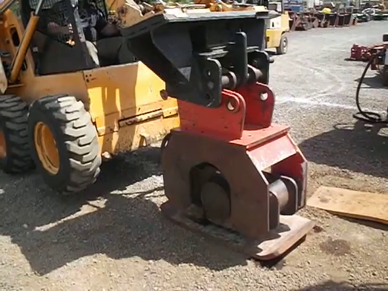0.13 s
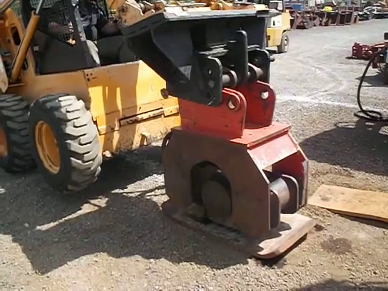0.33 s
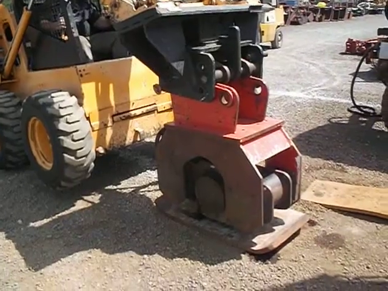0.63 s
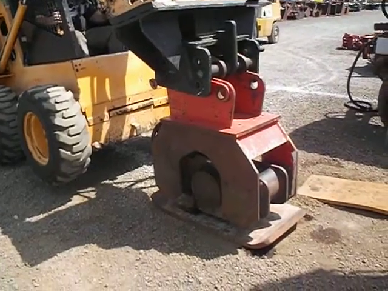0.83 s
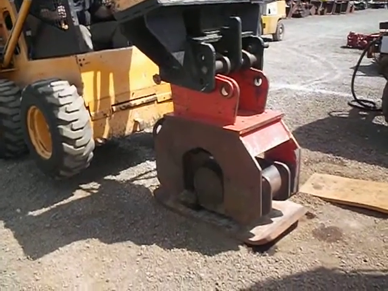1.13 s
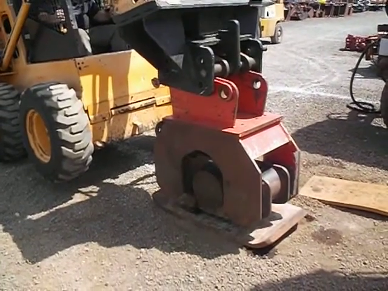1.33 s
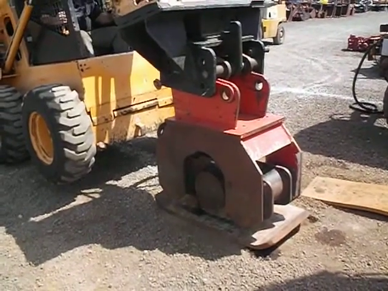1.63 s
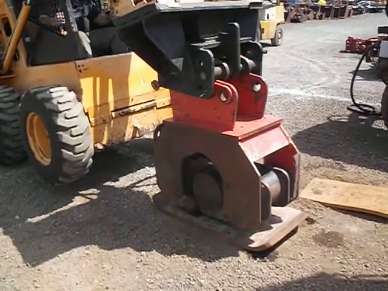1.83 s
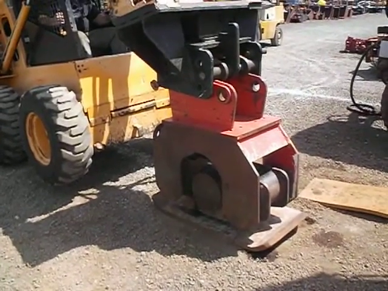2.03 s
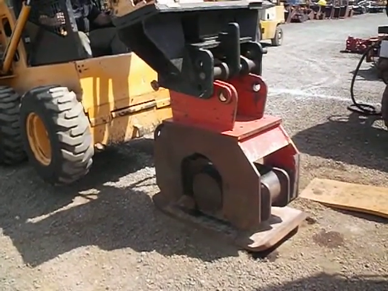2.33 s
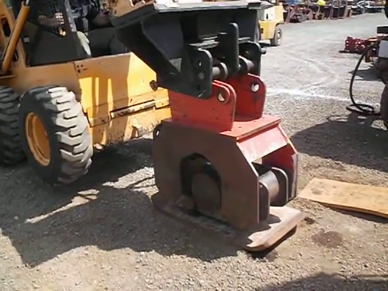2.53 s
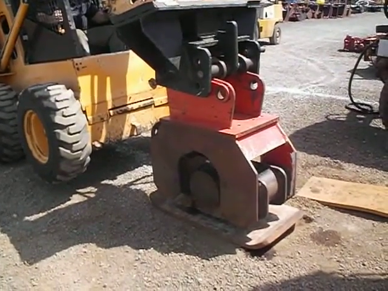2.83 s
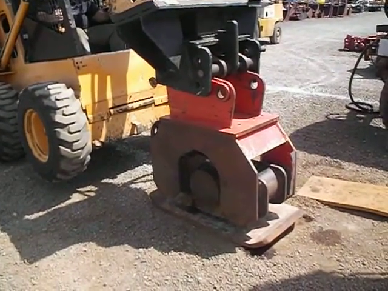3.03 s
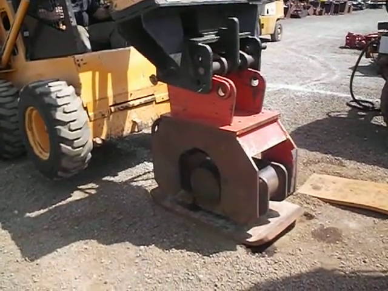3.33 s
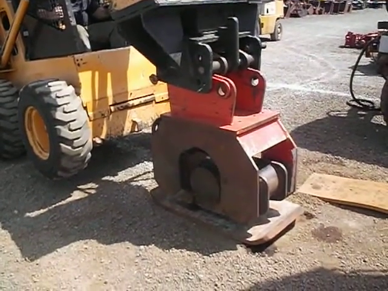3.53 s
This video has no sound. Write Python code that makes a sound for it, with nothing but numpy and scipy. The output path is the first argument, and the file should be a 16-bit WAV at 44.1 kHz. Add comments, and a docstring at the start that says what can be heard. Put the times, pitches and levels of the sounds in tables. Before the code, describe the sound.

Outdoors, a few metres from a small microphone, a diesel engine drones briefly before a plate compactor kicks in. It thumps, rattles and clanks quickly over a pump whine, then settles into fast, dull knocking that grows louder.

```python
"""Loader starting a plate compactor

A gravel yard, a small camera microphone a few metres from a diesel skid-steer loader at high revs.
It starts a hydraulic plate compactor: the engine sags under the load and the pump begins to whine.
The eccentric weight rattles the steel mount once a turn: bright clanks at first, then a duller,
regular knocking as the plate settles on the ground."""
import sys
import numpy as np
from scipy import signal
from scipy.fft import rfft, irfft
from scipy.io import wavfile
from scipy.ndimage import uniform_filter1d, minimum_filter1d

SR = 44100
rng = np.random.default_rng(int(sys.argv[2]) if len(sys.argv) > 2 else 0)


def to_wav(sig):
    """Store sig (one row per channel, or 1-D mono) as 16-bit WAV at the path in sys.argv[1].

    Samples outside -1..1 are clipped; the rate is SR.
    """
    pcm = np.clip(np.atleast_2d(sig), -1, 1) * 32767
    pcm = np.round(pcm).astype(np.int16)
    wavfile.write(sys.argv[1], SR, pcm.T)  # frames by channels


N = 162288
T = np.arange(N) / SR


def amp(db):
    """Decibels to gain."""
    return 10 ** (np.asarray(db) / 20)


def unit(x):
    """Scale to rms 1."""
    return x / np.sqrt(np.mean(x ** 2) + 1e-18)


def curve(rows, t=T):
    """Straight lines through (time, value) rows."""
    return np.interp(t, *np.array(rows, float).T)


def colour(x, rows):
    """Filter by a spectrum (f/Hz, relative level/dB), then scale to rms 1."""
    hz, db = np.array(rows, float).T
    f = np.maximum(np.arange(N // 2 + 1) * SR / N, 1)
    gain = amp(np.interp(np.log(f), np.log(hz), db))
    return unit(irfft(rfft(x) * gain, N))


def walk(rate_hz):
    """Smooth random wandering, rms 1."""
    size = max(int(SR / rate_hz), 2)
    drift = uniform_filter1d(rng.standard_normal(N), size, mode="wrap")
    return unit(uniform_filter1d(drift, size, mode="wrap"))


def ring(x, modes):
    """Drive decaying modes (f/Hz, t60/s, gain/dB) with x."""
    out = 0
    for hz, t60, db in modes:
        pole = np.exp((2j * np.pi * hz - np.log(1000) / t60) / SR)
        out = out + amp(db) * signal.lfilter([1], [1, -pole], x).imag
    return out


def blow(x, size=200):
    """Scale a blow so that its loudest few milliseconds have rms 1."""
    return x / np.sqrt(uniform_filter1d(x ** 2, size).max())


def add(out, x, at):
    """Mix x into out at a time in seconds."""
    i = int(np.clip(at * SR, 0, N))
    out[i:i + len(x)] += x[:N - i]


def tones(turns, rows, load, flutter_db, jitter):
    """Harmonics of a rotation that waver and change their balance with load."""
    out = 0
    for order, free_db, loaded_db in rows:
        gain = amp(free_db) * (1 - load) + amp(loaded_db) * load
        flutter = amp(flutter_db * min(order / 10, 1) * walk(40))
        phase = 2 * np.pi * (order * turns + rng.random()) + jitter * np.sqrt(order) * walk(6.7)
        out = out + np.sqrt(2) * gain * flutter * np.sin(phase)
    return out


# free-running clatter: f/Hz, relative level/dB
CLATTER_SPECTRUM = [(30, -10.5), (60, -4), (140, -10.5), (210, -8.5), (330, -0.5), (480, -0.5), (640, 1),
                    (800, -2.5), (1000, 2.5), (1150, -6), (1600, -5), (1850, -13), (2250, -18),
                    (2650, -11.5), (3100, -8.5), (3450, -18.5), (4000, -13.5), (4500, -19), (5050, -18.5),
                    (6300, -21), (8000, -35.5)]
# the clatter labours as the valve opens: t/s, level/dB before the load fades it out
CLATTER_LEVEL = [(.05, -20.5), (.6, -21), (.72, -18.5), (.78, -20), (.9, -16)]
# exhaust tones: multiple of crank speed, free level/dB, loaded level/dB
EXHAUST_TONES = [(2, -21.5, -32.5), (4, -41.5, -41.5), (5, -42.5, -42), (6, -44, -48), (8, -42.5, -54),
                 (9, -28.5, -39), (10, -29, -46.5), (12, -33, -53.5), (14, -45.5, -41.5), (18, -27, -36),
                 (20, -28, -30), (22, -36, -37), (27, -40.5, -40), (30, -50, -40)]
# fan tones: multiple of blade rate, free level/dB, loaded level/dB
FAN_TONES = [(1, -27, -35), (2, -43, -35.5), (3, -28, -56.5), (4, -38, -41.5)]


def engine(crank, load, firing_depth=0.32, decay_periods=0.36, blade_passes_per_turn=6.775):
    """The diesel, a few metres off: exhaust and fan tones, and clatter swelling at two firings a turn."""
    firing = unit(np.exp(-(2 * crank % 1) / decay_periods))
    pulsing = unit(1 - firing_depth + firing_depth * firing) * amp(0.78 * walk(25))
    clatter = colour(rng.standard_normal(N) * pulsing, CLATTER_SPECTRUM) * amp(curve(CLATTER_LEVEL))
    exhaust = tones(crank, EXHAUST_TONES, load, flutter_db=1.7, jitter=0.042)
    surge_db = 2 * np.exp(-((T - 0.735) / 0.048) ** 2)  # a swell as it takes up the load
    labour_db = 1.95 * load * walk(15)
    fan = tones(blade_passes_per_turn * crank, FAN_TONES, load, flutter_db=-1.5, jitter=0.48)
    return clatter * np.sqrt(1 - load) + exhaust * amp(labour_db + surge_db) + fan


# the pump's whine: t/s, level/dB
WHINE_LEVEL = [(.72, -36), (.79, -38), (.82, -19.5), (.87, -17), (.97, -16.5), (1.08, -23), (1.25, -28.5),
               (1.39, -19), (1.93, -20), (2.02, -16.5), (2.27, -19), (2.9, -20), (3.24, -23), (3.68, -23.5)]


def pump(crank, shaft, order=10, waver_db=1.26):
    """The loaded hydraulic pump sings one strong note, trembling with the compactor."""
    tremble = 1 + .1 * np.sin(2 * np.pi * shaft)
    gain = amp(curve(WHINE_LEVEL) + waver_db * walk(25))
    return np.sqrt(2) * gain * tremble * np.sin(2 * np.pi * order * crank + 0.066 * walk(25))


# engine and shaking steel under load: f/Hz, relative level/dB
RATTLE_SPECTRUM = [(150, -6.5), (350, -1.5), (520, -3.5), (650, 3), (800, 1.5), (960, 5), (1120, -6),
                   (1400, -2.5), (1800, -9), (2250, -17.5), (2650, -10.5), (3050, -10.5), (3400, -16),
                   (3900, -15.5), (4500, -19.5), (5000, -21), (6300, -21.5), (8000, -39.5)]
# that rattle at full load: t/s, level/dB
RATTLE_LEVEL = [(.8, -23.5), (1.15, -19), (1.3, -21.5), (1.6, -20), (1.8, -22), (2.05, -20), (2.45, -21.5),
                (2.7, -21.5), (3.0, -21.5), (3.1, -22.5), (3.68, -23)]
# the plate drumming on the yard floor: f/Hz, relative level/dB
GROUND_SPECTRUM = [(22, -1.5), (42, -4.5), (58, 3.5), (80, -4.5), (155, -10.5), (195, 4), (232, 13.5),
                   (290, 9), (360, -15), (500, -43.5)]
# that drumming: t/s, level/dB
GROUND_LEVEL = [(.1, -39), (.8, -42), (.93, -37.5), (1.05, -25), (1.35, -28.5), (2.0, -30.5), (2.35, -32.5),
                (2.9, -32.5), (3.68, -33.5)]


def shaking(shaft, load, depth=0.13, offset_turns=0.081, grit_db=2, hum_order=4):
    """Dense small contacts rattle the frame; the plate hums and drums on the ground."""
    swell = 1 + depth * np.cos(4 * np.pi * (shaft - offset_turns))  # at both ends of the stroke
    contacts = rng.standard_normal(N) * amp(grit_db * walk(620)) * swell
    rattle = colour(contacts, RATTLE_SPECTRUM) * amp(curve(RATTLE_LEVEL)) * np.sqrt(load)
    hum = np.sin(2 * np.pi * hum_order * shaft) * amp(-41 + 2 * walk(6)) * load
    drumming = colour(rng.standard_normal(N) * swell, GROUND_SPECTRUM) * amp(curve(GROUND_LEVEL))
    return rattle + hum + drumming


# plate modes: f/Hz, t60/s, relative gain/dB
PLATE_MODES = [(634, 0.016, 0.5), (957, 0.0094, 24.5), (1030, 0.0062, 2.5), (1310, 0.034, 3.5),
               (1650, 0.004, -3.5)]


def plate(push, band_hz=(480, 1900)):
    """The struck plate rings; the gravel cushions it and takes its treble."""
    cushion = signal.butter(5, band_hz, "band", fs=SR, output="sos")
    return blow(signal.sosfilt(cushion, ring(push, PLATE_MODES)))


def crunch(decay_s=0.011, size=2500):
    """A short burst of noise makes the plate crunch."""
    return plate(rng.standard_normal(size) * np.exp(-T[:size] / decay_s))


# the plate's knock: t/s, peak level/dB
KNOCK_LEVEL = [(.8, -24.5), (1.65, -24), (2.28, -27.5), (2.35, -17), (2.45, -17), (2.88, -18), (3.03, -11),
               (3.1, -11.5), (3.18, -14), (3.25, -8), (3.33, -9.5), (3.4, -7), (3.47, -12), (3.54, -8),
               (3.62, -8)]
# heavier jolts of the whole plate as it beds in: t/s, peak level/dB
JOLTS = [(.943, -19), (1.092, -25), (1.158, -16), (1.168, -19.5), (1.236, -28), (1.574, -16), (1.584, -13),
         (1.659, -16.5), (1.742, -17), (2.682, -13), (2.955, -15.5), (3.171, -11.5)]


def knocks(turn_times, lead_s=.0172, gap_s=.0033, edge_db=-5, crunch_db=-14):
    """Just before each clank the plate touches down on one edge, then lands flat on the gravel."""
    out = np.zeros(N)
    strike = plate(signal.unit_impulse(2500))
    for lands in turn_times - lead_s:
        gain = amp(curve(KNOCK_LEVEL, lands))
        add(out, gain * amp(edge_db) * strike, lands - gap_s * rng.uniform(0.93, 1.05))
        add(out, gain * (strike + amp(crunch_db) * crunch()), lands)
    for at, db in JOLTS:
        add(out, amp(db) * crunch(), at - gap_s)
    return out


# modes of the steel mount: f/Hz, t60/s, relative gain/dB
MOUNT_MODES = [(2660, .05, -15), (2850, 0.082, -8), (3047, 0.038, 14), (3013, 0.081, 6.5),
               (3260, 0.016, -6.5), (3612, 0.039, 2.5), (3700, .03, -15), (4430, 0.019, -20.5)]


def clank(ring_db, scrape_db, chatter_s=0.0089, scrape_s=.014, attack_s=0.00033, size=4000):
    """The loose mount chatters on its pins: ringing steel and a bright scrape that holds briefly."""
    t = T[:size]
    chatter, friction = rng.standard_normal((2, size)) * (1 - np.exp(-t / attack_s))
    band = signal.butter(3, (2850, 4600), "band", fs=SR, output="sos")
    steel = blow(signal.sosfilt(band, ring(chatter * np.exp(-t / chatter_s), MOUNT_MODES)))
    scrape = blow(signal.sosfilt(band, friction) / (1 + (t / scrape_s) ** 3))
    return amp(ring_db) * steel + amp(scrape_db) * scrape


# the ring in each clank: t/s, peak level/dB
RING_LEVEL = [(.95, -52.5), (1.02, -26), (1.09, -26), (1.16, -26), (1.3, -20.5), (1.44, -21), (1.66, -33.5),
              (1.81, -32), (1.95, -35), (2.3, -33.5), (2.55, -35), (2.7, -27.5), (3.0, -34.5), (3.12, -26),
              (3.28, -33), (3.49, -26), (3.68, -29.5)]
# the steel-on-steel scrape in each clank: t/s, peak level/dB
SCRAPE_LEVEL = [(.88, -31), (.95, -34), (1.02, -26), (1.09, -23), (1.16, -28), (1.3, -24), (1.44, -25.5),
                (1.66, -25.5), (1.81, -37), (1.95, -33), (2.3, -39), (2.7, -36), (3.63, -41)]
# lighter clanks on the return stroke while the plate beds in: t/s, peak scrape level/dB
REBOUNDS = [(0.985, -32.5), (1.058, -28), (1.134, -30.5), (1.199, -31.5), (1.551, -35), (1.764, -32)]


def clanks(turn_times, lead_s=0.00125):
    """The mount clanks once a turn, with a few scraping rebounds in between."""
    out = np.zeros(N)
    for at in turn_times:
        add(out, clank(curve(RING_LEVEL, at), curve(SCRAPE_LEVEL, at)), at - lead_s)
    for at, db in REBOUNDS:
        add(out, clank(ring_db=db - 8, scrape_db=db), at)
    return out


# dull thumps as the plate starts: t/s, peak level/dB
THUMPS = [(0.944, -20), (.995, -14), (1.16, -21), (1.206, -17), (1.259, -25), (1.75, -22)]
# modes of the ground: f/Hz, t60/s, relative gain/dB
GROUND_MODES = [(45, 0.06, -11.5), (134.5, 0.097, -8.5), (223, 0.089, 2), (272, 0.034, 0)]


def thumps(push_s=0.0033, size=6000):
    """The plate's first soft landings boom in the yard floor."""
    out = np.zeros(N)
    push = np.sin(np.pi * np.minimum(T[:size] / push_s, 1)) ** 2
    boom = blow(ring(push, GROUND_MODES))
    for at, db in THUMPS:
        add(out, amp(db) * boom, at)
    return out


# crankshaft speed, sagging under load: t/s, f/Hz
CRANK_SPEED = [(0, 47.8), (.6, 47.65), (.75, 46.8), (.87, 44.4), (.97, 44.2), (1.15, 44.6), (1.35, 44.72),
               (3.68, 44.72)]
# speed of the eccentric weight once started: t/s, f/Hz
SHAFT_SPEED = [(1.40, 14.2), (1.48, 13.71)]


def scene(valve_s=0.806, valve_ramp_s=0.23, shaft_start_s=.808):
    """Loader and compactor in the open yard, in mono; the load rises as the hydraulic valve opens."""
    load = np.clip((T - valve_s) / valve_ramp_s + .5, 0, 1)
    crank = np.cumsum(curve(CRANK_SPEED) * (1 + 0.0009 * walk(6.9))) / SR  # angles in turns
    shaft = np.cumsum(curve(SHAFT_SPEED) * (T > shaft_start_s)) / SR
    turn_times = np.interp(np.arange(1, shaft[-1]), shaft, T)
    running = engine(crank, load) + pump(crank, shaft) + shaking(shaft, load)
    return (running + clanks(turn_times) + knocks(turn_times) + thumps())[None]


# the microphone's treble roll-off: f/Hz, gain/dB
MIC_RESPONSE = [(0, 0), (5050, 0), (5500, -13), (6100, -25), (7000, -50), (22050, -80)]


def record(dry, opens_s=.036, ceiling=.72, limiter_s=.002, top_hz=6100):
    """A small camera microphone opens just after the start, limits the peaks and loses the treble."""
    hz, db = np.array(MIC_RESPONSE, float).T
    rolloff = signal.firwin2(255, hz, amp(db), fs=SR)
    dull = signal.fftconvolve(dry, rolloff[None], "same")
    size = int(limiter_s * SR)
    reduction = ceiling / np.maximum(np.abs(dull), ceiling)
    gain = uniform_filter1d(minimum_filter1d(reduction, 2 * size), size)
    lowpass = signal.ellip(10, .2, 80, top_hz, fs=SR, output="sos")
    return signal.sosfilt(lowpass, dull * gain * (T > opens_s))


dry = scene()
out = record(dry)
to_wav(out)
```